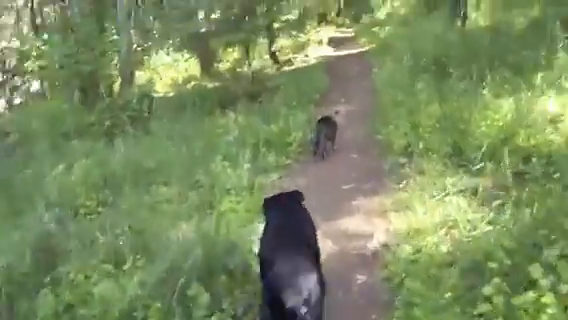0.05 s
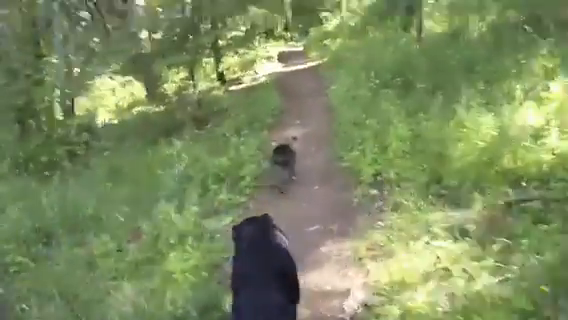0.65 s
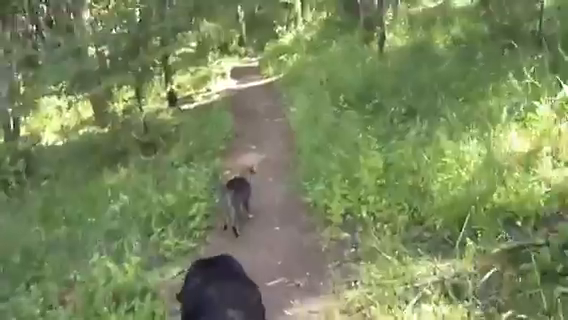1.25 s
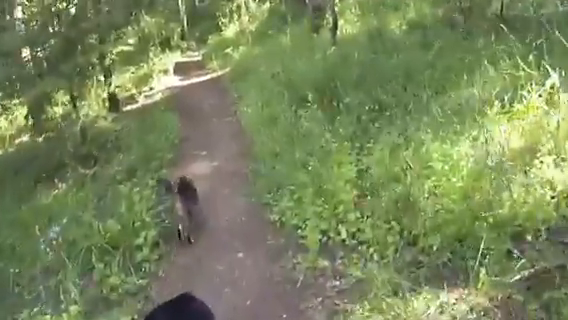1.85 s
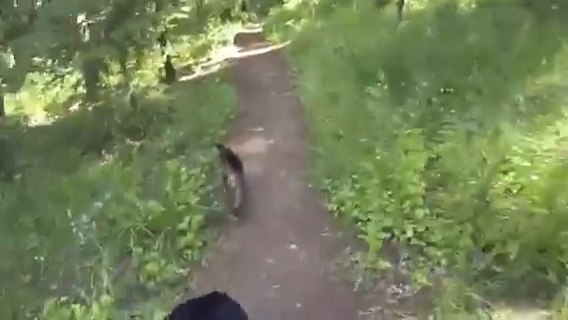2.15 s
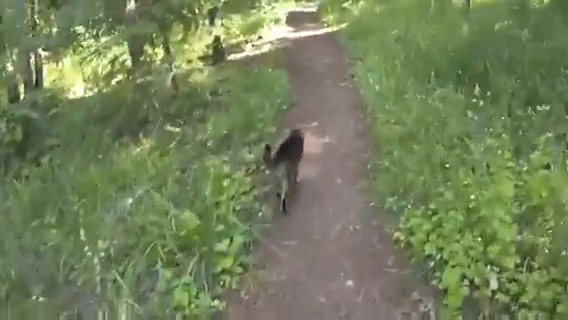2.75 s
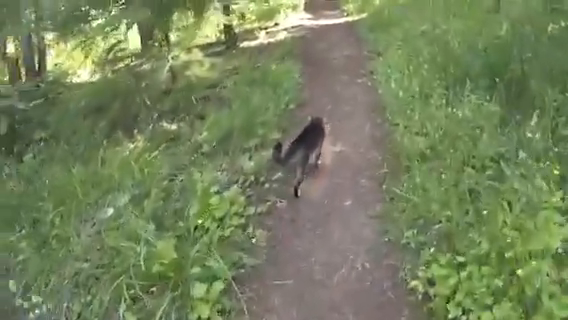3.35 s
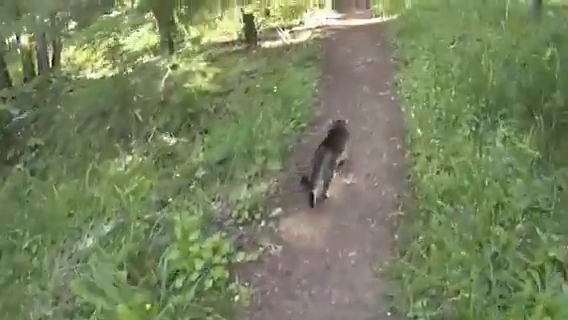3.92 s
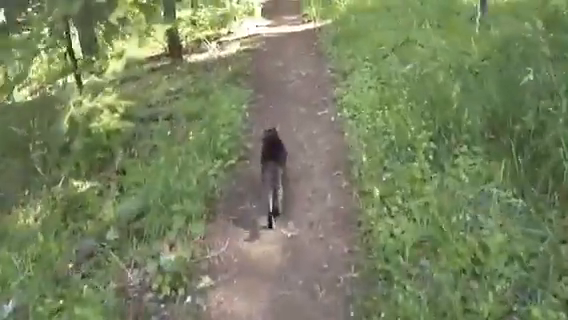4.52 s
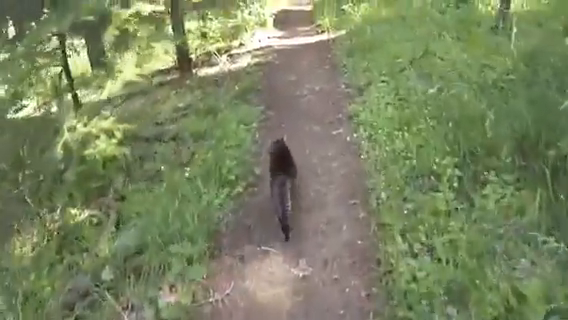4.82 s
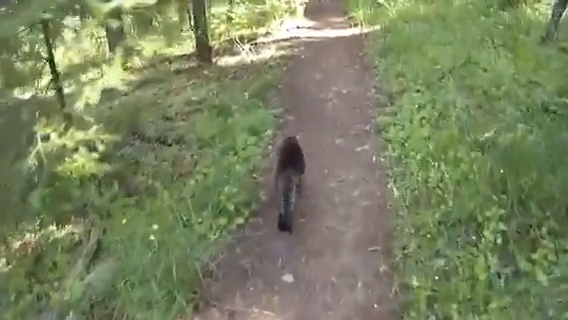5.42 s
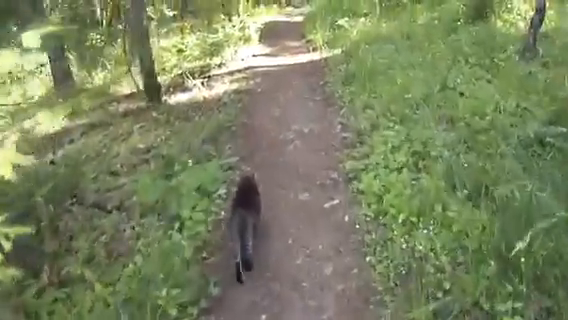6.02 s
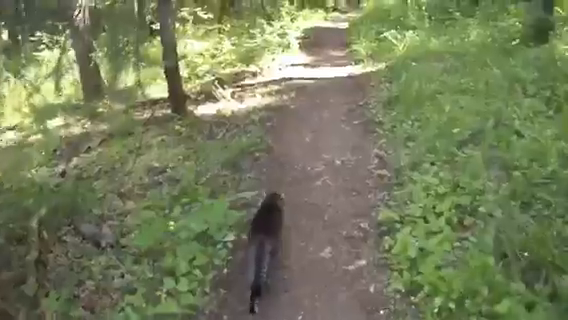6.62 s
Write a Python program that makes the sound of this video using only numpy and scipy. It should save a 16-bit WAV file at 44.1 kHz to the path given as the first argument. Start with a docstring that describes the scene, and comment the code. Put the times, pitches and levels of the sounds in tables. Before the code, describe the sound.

A jay squawks and scolds with harsh, repeated rasps in woodland, over soft footsteps on dirt and a few sharp clucks.

```python
"""A jay scolds over a woodland path: six harsh rasps and three higher, falling two-voiced squawks.
A rasp is uneven pulses and air ringing the throat; in a squawk one side of the syrinx yelps while
the other cries. The trees throw the calls back. Close by, soles grind the dirt, twigs crack and five
sharp clucks snap; a small bird chirps and trills faintly over the hush of the wood."""
import sys
import numpy as np
from scipy import signal
from scipy.fft import rfft, irfft
from scipy.io import wavfile
from scipy.ndimage import uniform_filter1d, map_coordinates

SR = 44100
rng = np.random.default_rng(int(sys.argv[2]) if len(sys.argv) > 2 else 0)


def wav_out(sig):
    """Save sig, one row per channel (or a flat mono array), as 16-bit PCM at SR to the path in sys.argv[1]."""
    wavfile.write(sys.argv[1], SR, np.round(np.clip(np.atleast_2d(sig).T, -1, 1) * 32767).astype(np.int16))


N = 294131

# The tone of the wood's air. Each row: frequency in Hz, gain in dB.
HUSH_EQ = [(15, -54), (25, -24), (293, -4.5), (582, -1.5), (661, -2), (992, -2), (1280, -3.5), (2120, -10),
           (2600, -12.5), (3190, -13), (3910, -13), (4910, -14.5), (6010, -19), (7000, -19), (10800, -22.5),
           (14000, -31), (22000, -120)]
# The wood's reverb tail. Each row: frequency in Hz, seconds to die away by 60 dB.
TAIL_DECAY = [(300, 1.4), (1300, 0.89), (2500, 0.97), (2900, 1.2), (3300, 0.79), (3800, 1.36), (6000, 0.8),
              (10000, 1.05)]
# The tone of ground dirt. Each row: frequency in Hz, gain in dB.
DIRT_EQ = [(100, -26), (400, -11), (1100, 5.5), (2200, 6), (4500, 0), (8000, -9), (11000, -13)]
# Soles scuffing. Each row: start in seconds, length in seconds, level in dB, treble tilt in dB per octave.
SOLE_SCUFFS = [(0.016, 0.14, -46.5, -4.5), (0.456, 0.096, -49.5, 7), (0.643, 0.11, -44, -2.5),
               (1.326, 0.14, -45, -3), (2.015, 0.064, -44, -1.5), (2.068, 0.127, -47, -1.5),
               (5.558, 0.063, -44, 1), (5.628, 0.08, -46, -3.5), (5.957, 0.11, -52, 3),
               (6.183, 0.052, -41, -8.5), (6.424, 0.033, -43.5, -3), (6.526, 0.058, -47, 6)]
# Twigs and pebbles underfoot. Each row: start in seconds, level in dB, ring in Hz, crack trim in dB.
TWIG_SNAPS = [(0.052, -28.5, 1080, -22), (0.082, -20.5, 1370, -29.5), (0.122, -29.5, 737, -30),
              (0.339, -24, 970, -35), (0.393, -24, 1140, -34), (0.468, -28.5, 2420, -14),
              (0.661, -24.5, 1420, -21), (0.715, -28, 1410, -20), (0.729, -27, 1360, -32),
              (0.964, -29, 730, -11.5), (1.391, -25.5, 708, -26), (1.41, -21.5, 2800, -33),
              (1.499, -25, 1520, -19), (2.196, -25, 1160, -21), (2.202, -23.5, 1164, -21),
              (4.941, -21.5, 940, -30), (4.999, -25, 1480, -11), (5.404, -25, 4200, -13.5),
              (5.568, -28, 1270, -22), (5.815, -28.5, 716, -22), (5.986, -25, 1360, -13),
              (6.413, -27, 3130, -6.5), (6.475, -25.5, 1210, -26)]
# Double-snap clucks. Each row: start in seconds, level in dB, ring in Hz, seconds to the second snap,
# that snap's level against the first in dB.
CLUCK_CUES = [(0.29, -23, 2440, 0.0025, 3), (0.4254, -24.5, 2150, 0.0026, 8.5),
              (0.5617, -12.5, 2050, 0.0041, -14), (0.693, -20.5, 2170, 0.001959, 6),
              (0.835, -15.5, 2150, 0.0021, -2.5)]
# Throat and beak in a squawk. Each row: frequency in Hz, gain in dB.
SQUAWK_EQ = [(1150, -14.5), (1500, -11.5), (2000, -10), (2500, -9.5), (3100, -2.5), (3700, -15.5),
             (4400, -19), (5400, -22.5), (7000, -28), (9000, -29), (11000, -44)]
# The squawks, ahead of their fader. Each row: start, length, time to the cry's fall and time to its break
# in seconds, cry and yelp levels in dB, seconds to the yelp's swell, that swell in dB,
# trims for the cry's fundamental and high overtones in dB.
SQUAWK_CUES = [(.987, .262, .06, 0.21, -19, -31.5, 0.052, 9, -3.5, -1.5),
               (3.395, .205, .056, .187, -14, -26, 0.03, 6, -10, -3.5),
               (6.057, .266, .058, .186, -16.2, -28, 0.0575, 14.5, -4, -1.5)]
# Throat and beak in a rasp. Each row: frequency in Hz, gain in dB.
RASP_EQ = [(200, -42), (480, -22), (720, -18), (1030, -9), (1250, -3.5), (1500, -2), (1850, -4.5),
           (2200, -6.5), (2780, -24), (3400, -15.5), (3800, -22), (4250, -29), (5200, -21.5), (5700, -25.5),
           (6300, -24), (7600, -29.5), (9000, -36.5), (11000, -38.5)]
# The rasps, ahead of their fader. Each row: start, length and time to the top of the pitch arch in seconds,
# body level, treble level and fade after the top in dB, top and end pitch in Hz, main resonance in Hz,
# its level in dB, treble tilt in dB per octave, shrill bite in dB.
RASP_CUES = [(2.227, 0.31, 0.086, -23, -42.5, -9, 516.3, 334, 1553, -1, 3, -10),
             (2.691, 0.23, 0.089, -21.5, -40.3, -4, 524, 416.6, 1594, -1, 2, -13),
             (3.148, .218, .078, -20, -37, -4, 547.4, 406.7, 1600, -6.5, 1.5, -5),
             (3.564, .275, .083, -17.5, -35.5, -5.5, 538, 411, 1564, 3, -0.5, -15),
             (4.072, .26, 0.088, -19.4, -36.5, -5, 544, 408.2, 1528, 0.5, -0.5, -3.5),
             (4.635, .235, .077, -22, -34.5, -10, 541.6, 398.6, 1640, -12, -4, -4)]


def amp(db):
    """Decibels to gain."""
    return 10 ** (np.asarray(db) / 20)


def unit(x):
    """Scales to an rms of one."""
    return x / np.sqrt(np.mean(x ** 2) + 1e-20)


def steady(x):
    """Rides the level to one, leaving the fast grain."""
    return x / np.sqrt(abs(uniform_filter1d(x ** 2, size=700)) + 1e-9)


def read(curve, hz):
    """Reads a curve on a log-frequency axis."""
    f, value = np.transpose(curve)
    return np.interp(np.log(hz + 1), np.log(f + 1), value)


def add(mix, start, sound):
    """Lays a sound into the mix at start seconds."""
    part = mix[max(round(start * SR), 0):][:len(sound)]
    part += sound[:len(part)]


def eq(x, curve, tilt_db=0):
    """Filters by an EQ curve, tilted by tilt_db per octave above 500 Hz."""
    hz = np.fft.rfftfreq(2 * len(x), 1 / SR)
    gain = amp(read(curve, hz) + tilt_db * np.log2(np.maximum(hz, 500) / 500))
    return irfft(rfft(x, 2 * len(x)) * gain)[:len(x)]


def highpass(x, hz):
    """The part of a sound above hz."""
    return signal.sosfiltfilt(signal.butter(2, hz, "high", fs=SR, output="sos"), x)


def wander(size, hz):
    """Random motion slower than hz, of rms one."""
    f = np.fft.rfftfreq(size, 1 / SR)
    return unit(irfft(rfft(rng.standard_normal(size)) / np.sqrt(1 + (f / hz) ** 6), size))


def partial(hz, jitter, jitter_hz):
    """A sine that follows the curve hz and trembles around it."""
    return np.sin(2 * np.pi * np.cumsum(hz * (1 + jitter * wander(len(hz), jitter_hz))) / SR)


def bump(t, at, width):
    """A smooth hump of height one."""
    return np.exp(-((t - at) / width) ** 2)


def step(t, at, width):
    """A smooth rise from zero to one."""
    return .5 + .5 * np.tanh((t - at) / width)


def hush(level_db=-48.5, swell_db=1.7):
    """The bed: the steady, slightly swelling air of the wood."""
    return amp(level_db + swell_db * wander(N, 8.7)) * unit(eq(rng.standard_normal(N), HUSH_EQ))


def woodland(x, near_db, far_db, near_t60=.36, echoes_per_s=700, bloom_s=.11):
    """Nearby trunks add a quick spray of echoes, the depth of the wood a long soft tail."""
    t = np.arange(SR) / SR
    trunks = rng.standard_normal(SR) * (rng.random(SR) < echoes_per_s / SR)
    trunks *= (t > .002) * amp(-60 * t / near_t60)
    wash = rng.standard_normal(SR) * np.minimum(t / bloom_s, 1)
    hz, seconds, bands = signal.stft(wash, SR, nperseg=256)
    decay = amp(-60 * seconds / read(TAIL_DECAY, hz)[:, None])
    tail = signal.istft(bands * decay, SR, nperseg=256)[1][:SR]
    echoes = amp(near_db) * trunks / np.linalg.norm(trunks) + amp(far_db) * tail / np.linalg.norm(tail)
    return x + signal.fftconvolve(x, echoes)[:N]


def whistle(hz, db, jitter, breath_db):
    """A pure tone that follows the curve hz, with a little hiss on top."""
    hiss = amp(breath_db) * unit(highpass(eq(rng.standard_normal(len(hz)), SQUAWK_EQ), 6800))
    return amp(db) * (np.sqrt(2) * partial(hz, jitter, 260) + hiss) * signal.windows.tukey(len(hz), .1)


def chirp(length, from_hz, to_hz, db):
    """A short whistled note on a straight pitch line."""
    return whistle(np.linspace(from_hz, to_hz, int(length * SR)), db, jitter=.004, breath_db=-24)


def trill(length=.1, sweeps_per_s=62, top_hz=5600, low_hz=3700, db=-56, fade_db=6):
    """A far small bird: a fast run of downward sweeps."""
    t = np.arange(0, length, 1 / SR)
    cycle = (t * sweeps_per_s) % 1
    phase = 2 * np.pi * np.cumsum(top_hz + (low_hz - top_hz) * cycle) / SR
    return amp(db - fade_db * t / t[-1]) * np.sin(phase) * np.sqrt(abs(np.sin(np.pi * cycle)))


def ping(hz, rise_s):
    """A snap in a heavily damped cavity: a few cycles that swell and die."""
    t = np.arange(900) / SR
    return t / rise_s * np.exp(1 - t / rise_s) * np.sin(2 * np.pi * hz * t)


def footsteps(grit_per_s=1500, crack_s=.0028, crumble_db=-15, crumble_s=.0023, give_s=.0015):
    """Soles grind clumps of grit; a twig or pebble gives way with a knock, a crack and a crumble."""
    out, t = np.zeros(N), np.arange(900) / SR
    for start, length, db, tilt_db in SOLE_SCUFFS:
        size = int(length * SR)
        grain_db = 3.5 * np.minimum(rng.exponential(1, size), 4)
        grit = amp(grain_db) * (rng.random(size) < grit_per_s / SR)
        grind = eq((grit + .16) * rng.standard_normal(size), DIRT_EQ, tilt_db)
        add(out, start, amp(db) * unit(grind * signal.windows.tukey(size, .4)))
    for start, db, hz, crack_db in TWIG_SNAPS:
        dirt = unit(eq(rng.standard_normal(len(t)), DIRT_EQ))
        crack = amp(crack_db - 2) * np.exp(-t / crack_s) * unit(highpass(dirt, 1500))
        crumble = amp(crumble_db) * np.exp(-t / crumble_s) * dirt
        add(out, start + give_s, amp(db) * (ping(hz, rise_s=.41 / hz) + crack + crumble))
    return highpass(out, 120)


def clucks(body_hz=1250, body_db=-7, slap_db=-20, slap_s=.0051):
    """Each cluck snaps twice in a small, dull cavity; a nearby surface slaps the first snap back."""
    out = np.zeros(N)
    for start, db, hz, gap_s, second_db in CLUCK_CUES:
        snap = .9 * ping(hz, rise_s=.00035) + amp(body_db) * ping(body_hz, rise_s=.00022)
        add(out, start, amp(db) * snap)
        add(out, start + gap_s, amp(db + second_db) * snap)
        add(out, start + slap_s, amp(db + slap_db) * snap)
    return eq(out, [(150, -18), (800, 0), (3000, 0), (3900, -19.5), (9000, 5)])


def yelp(level_db, swell_s, swell_db, length=.086, from_hz=3475, to_hz=3040, glide_s=.0298):
    """One side of the syrinx opens the squawk: a sinking tone that flicks upward, then swells."""
    t = np.arange(0, length, 1 / SR)
    flick = bump(t, at=.022, width=.006)
    hz = to_hz + (from_hz - to_hz) * np.exp(-t / glide_s) + 717 * flick
    release = (t / length) ** 6
    db = level_db - 7 * flick + swell_db * bump(t, swell_s, width=.0074) - 4 * release
    return whistle(hz, db, jitter=.012, breath_db=-27)


def cry(length, fall_s, break_s, level_db, first_db, high_db,
        from_hz=1756, top_hz=2037, drop_hz=329.7, sag_hz_per_s=2200, break_hz=90.2, hoarse_hz=3300):
    """The other side of the syrinx: falling harmonics, the second sliding through the throat's peak."""
    t = np.arange(0, length, 1 / SR)
    falling, broken = np.maximum(t - fall_s, 0), step(t, break_s, width=.0016)
    # the pitch scoops up, drops quickly, sags and finally breaks downward
    hz = top_hz + (from_hz - top_hz) * np.exp(-t / .014)
    hz -= drop_hz * (1 - np.exp(-falling / .027)) + sag_hz_per_s * falling + break_hz * broken
    # after an opening blip the cry sits under the yelp until its fall
    held_back = 1 - step(t, fall_s, width=.006)
    db = level_db - 12.5 * held_back - 28.5 * falling - 4 * broken
    gain = amp(db) + amp(level_db + 2) * bump(t, at=.016, width=.0047)
    waver = .008 * wander(len(t), 900) + .007 * wander(len(t), 60)
    phase = 2 * np.pi * np.cumsum(hz * (1 + waver)) / SR
    stack = amp(read(SQUAWK_EQ, hz) + first_db) * np.sin(phase)
    stack += amp(read(SQUAWK_EQ, 2 * hz)) * np.sin(2 * phase)
    for k in range(3, 10):
        fray = .22 * k * wander(len(t), 260)
        shimmer_db = 2.9 * wander(len(t), 19)
        stack += amp(read(SQUAWK_EQ, k * hz) + high_db + shimmer_db) * np.sin(k * phase + fray)
    breath = amp(high_db - 22) * unit(eq(rng.standard_normal(len(t)), SQUAWK_EQ, tilt_db=11))
    # air rings the throat's main resonance
    breath += amp(-21.5) * partial(np.full(len(t), hoarse_hz), .04, 400) * wander(len(t), 200)
    flutter = np.exp(.18 * wander(len(t), 180))
    return gain * (np.sqrt(2) * stack + breath) * flutter * signal.windows.tukey(len(t), .05)


def syrinx_rattle(hz, slack):
    """Smeared pulses of uneven strength and puffs of air; more slack makes them rougher and breathier."""
    jitter, air = .036 + .03 * slack, .2 + .4 * slack
    turns = np.cumsum(hz * (1 + jitter * wander(len(hz), 300))) / SR
    pulses = sum(np.cos(2 * np.pi * k * (turns + k / 36)) for k in range(3, 27))
    pulses *= np.exp(.35 * np.tanh(wander(len(hz), 200)))
    puffs = (.69 + np.exp(-(turns % 1) / .5)) * rng.standard_normal(len(hz))
    return np.sqrt(1 - air) * unit(pulses) + np.sqrt(air) * unit(puffs)


def throat(x, shift):
    """The rasp's resonances all slide by the factor shift: one EQ run on a stretched clock."""
    clock = np.cumsum(shift)
    positions = np.interp(np.arange(clock[-1]), clock, np.arange(len(x)))
    stretched = map_coordinates(x, [positions], order=3)
    return map_coordinates(eq(stretched, RASP_EQ), [clock], order=3)


def rasp(length, top_s, body_db, treble_db, fade_db, top_hz, end_hz, core_hz, core_db, tilt_db, bite_db,
         growl_hz=423.9, overtone_hz=3397, bite_hz=5800, attack_s=.019, beak_open_s=.022, release_s=.021):
    """The jay's scold: the rattling syrinx rings the throat, clearest at the top of its pitch arch."""
    t = np.arange(0, length, 1 / SR)
    early = np.clip(1 - t / top_s, 0, 1)  # one at the start, zero from the top on
    late = np.clip((t - top_s) / (length - top_s), 0, 1)  # zero until the top, one at the end
    hz = top_hz + (growl_hz - top_hz) * early ** 1.6 + (end_hz - top_hz) * late ** 1.2
    rattle = syrinx_rattle(hz, slack=np.maximum(early, late))
    voice = unit(throat(rattle, shift=1.02 - .24 * early ** 2 - .017 * late))
    voice *= 1 - .3 * early ** 3
    # the main resonance sings, sliding up and down with the beak
    core = partial(core_hz - 300 * early ** 1.5 - 210 * late ** .7, .037, 250)
    voice += amp(core_db) * core * (1 + .5 * wander(len(t), 180))
    climb = np.sqrt(t / length)  # lifts two upper resonances: a thin overtone and a shrill bite
    overtone = partial(overtone_hz + 529 * climb, .012, 300)
    voice += amp(-18.5) * (1 - early) * overtone * wander(len(t), 77)
    # the two lowest harmonics stay clear under the rattle
    low = amp(-16) * partial(hz, .03, 200) + amp(-7.2) * partial(2 * hz, .034, 200)
    voice += (1 - .8 * early - .4 * late).clip(.2) * low
    treble = highpass(voice, 4400)
    edge = unit(eq(treble, [(500, 0), (11000, 0)], tilt_db))
    edge += amp(bite_db) * partial(bite_hz + 700 * climb, .025, 500) * wander(len(t), 300)
    # the treble opens later with the beak, fades less, and flares as the body drops away
    release = np.exp((t - length) / release_s)
    body_gain = amp(body_db - 15.5 * np.exp(-t / attack_s) + fade_db * late - 6.5 * release)
    edge_gain = amp(treble_db - 30.5 * np.exp(-t / beak_open_s) + .73 * fade_db * late + 2.5 * release)
    sound = body_gain * steady(voice - treble) + edge_gain * steady(edge)
    return sound * signal.windows.tukey(len(t), .16)


def scene():
    """The mix: birds back among the trees, clucks and footsteps close and nearly dry, the hush beneath."""
    rasps, squawks, thin_whistle, small_bird = np.zeros((4, N))
    for start, *shape in RASP_CUES:
        add(rasps, start, rasp(*shape))
    for start, length, fall_s, break_s, cry_db, yelp_db, swell_s, swell_db, *trims in SQUAWK_CUES:
        add(squawks, start, cry(length, fall_s, break_s, cry_db, *trims))
        add(squawks, start, yelp(yelp_db, swell_s, swell_db))
    add(thin_whistle, 1.01, chirp(.078, from_hz=4680, to_hz=4680, db=-38))  # inside the first squawk
    add(small_bird, 1.553, chirp(.022, from_hz=5900, to_hz=3830, db=-50.5))
    add(small_bird, 1.8, trill())
    mix = amp(-2) * woodland(rasps, near_db=-3.5, far_db=-12)
    mix += amp(-4) * woodland(squawks, near_db=-3, far_db=-13)
    mix += woodland(thin_whistle, near_db=-12, far_db=-19)
    mix += woodland(small_bird, near_db=0, far_db=6)
    mix += woodland(clucks() + footsteps(), near_db=-49, far_db=-19.5)
    return (mix + hush())[None]


def record(dry):
    """A steep low-pass takes off the top above 11 kHz."""
    lowpass = signal.firwin(601, 11020, window=("kaiser", 8), fs=SR)
    return signal.oaconvolve(dry, lowpass[None], "same")


dry = scene()
out = record(dry)
wav_out(out)
```